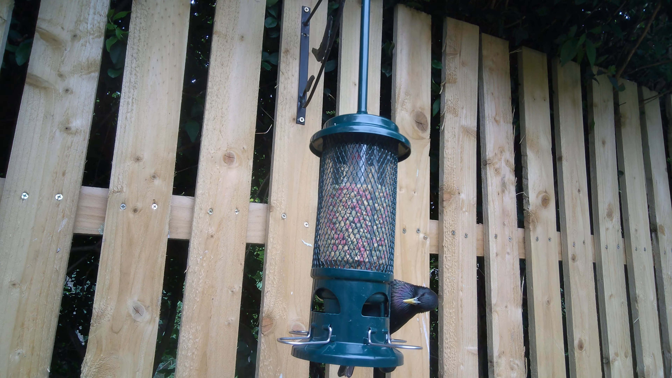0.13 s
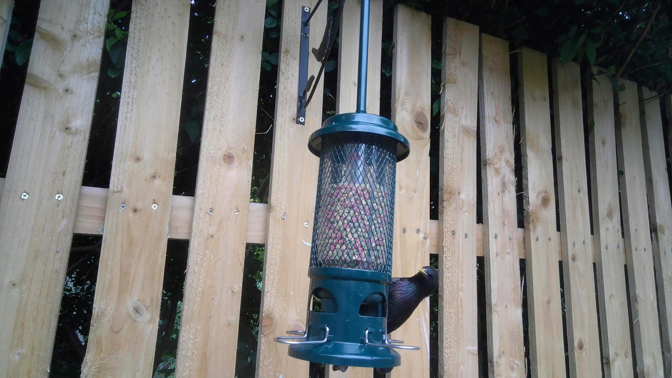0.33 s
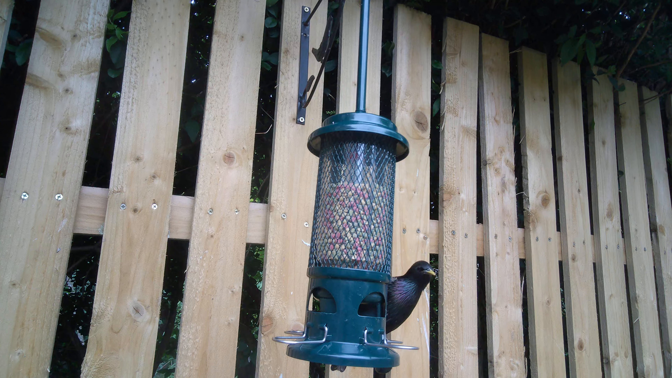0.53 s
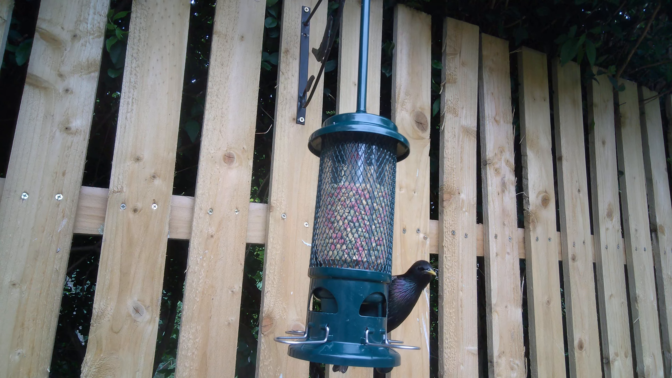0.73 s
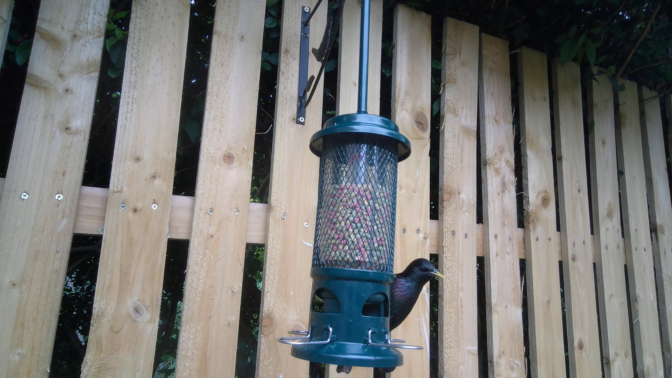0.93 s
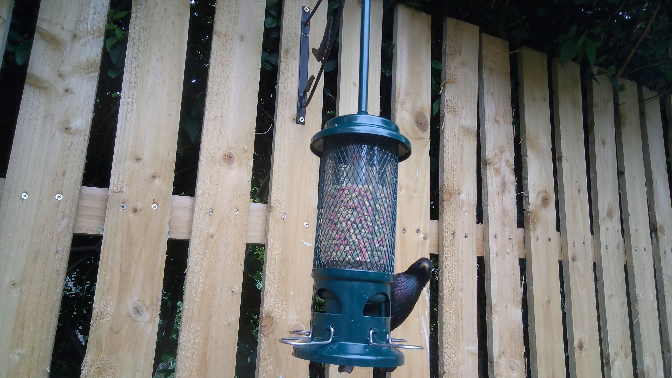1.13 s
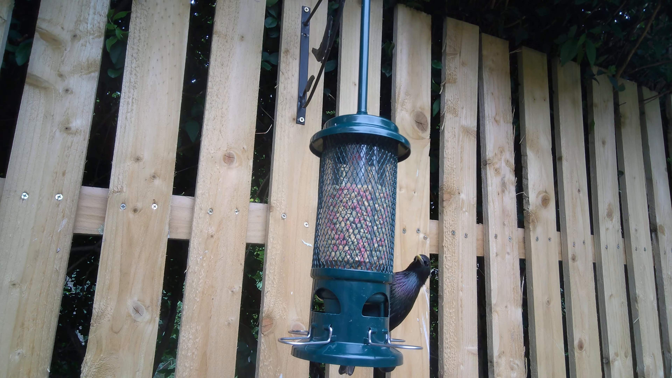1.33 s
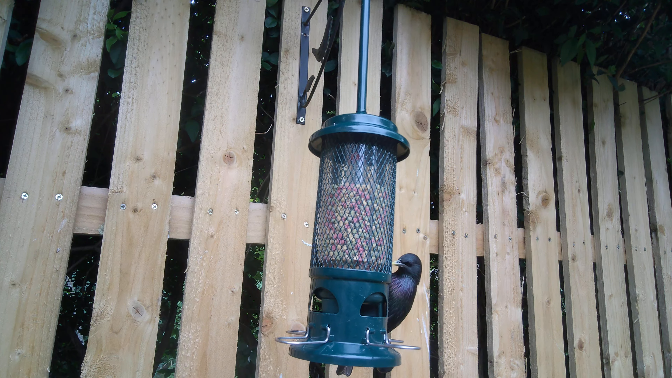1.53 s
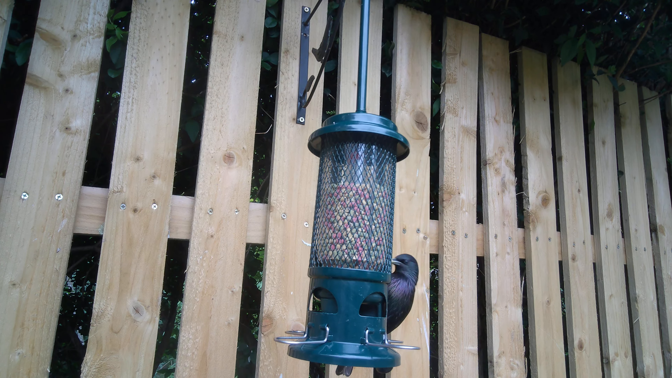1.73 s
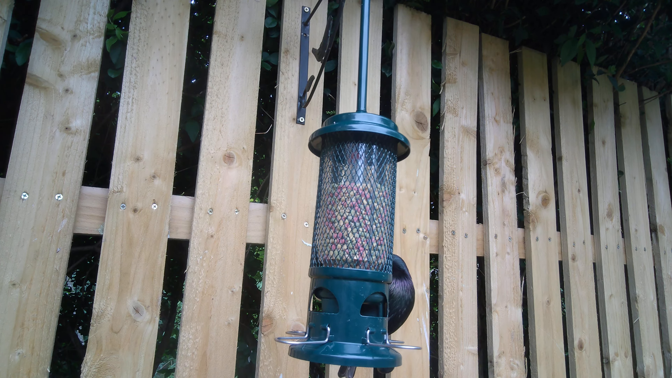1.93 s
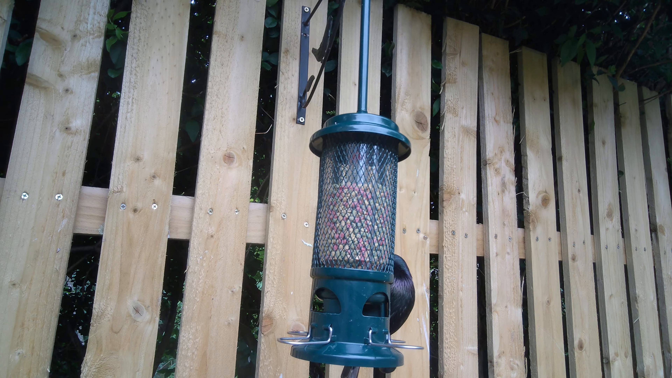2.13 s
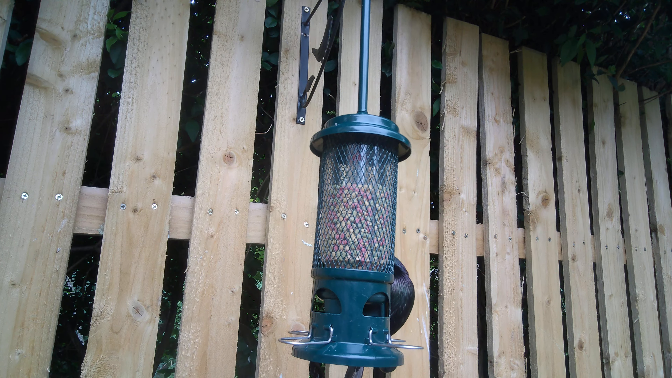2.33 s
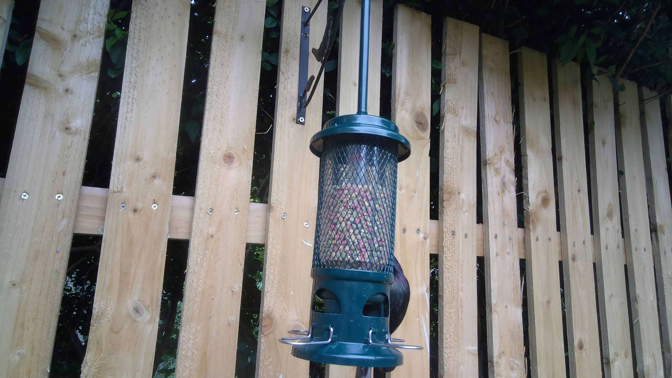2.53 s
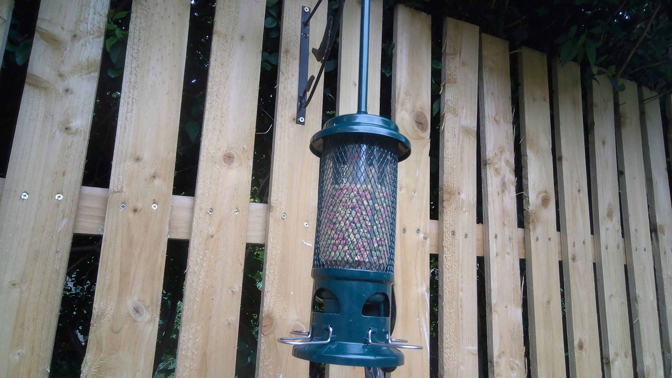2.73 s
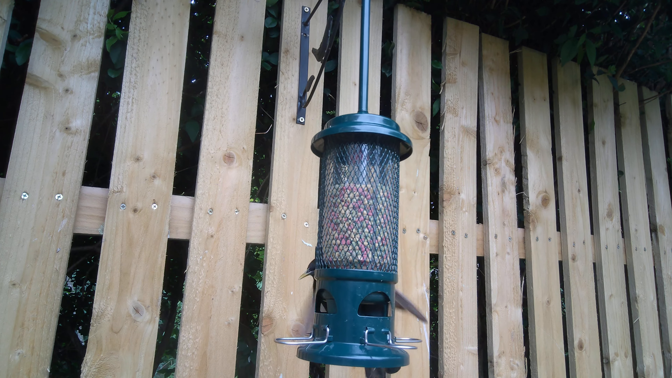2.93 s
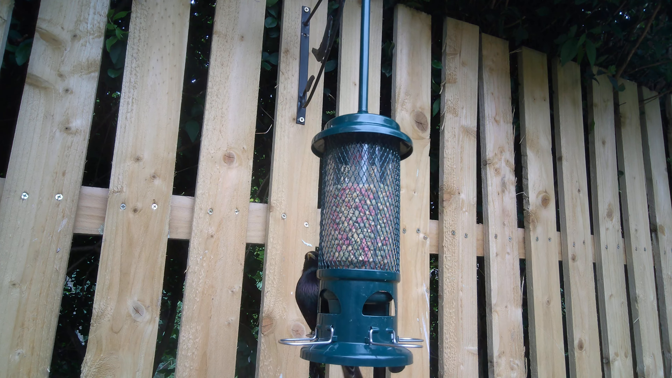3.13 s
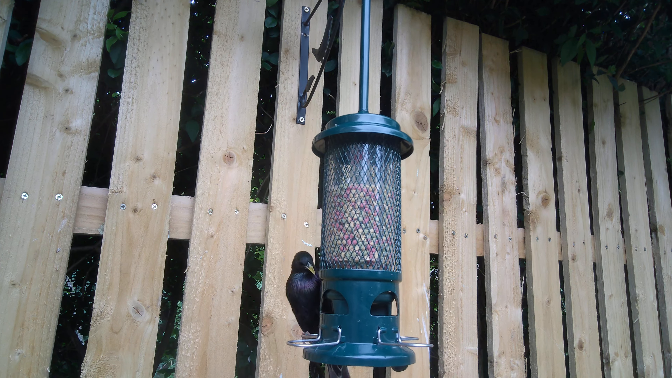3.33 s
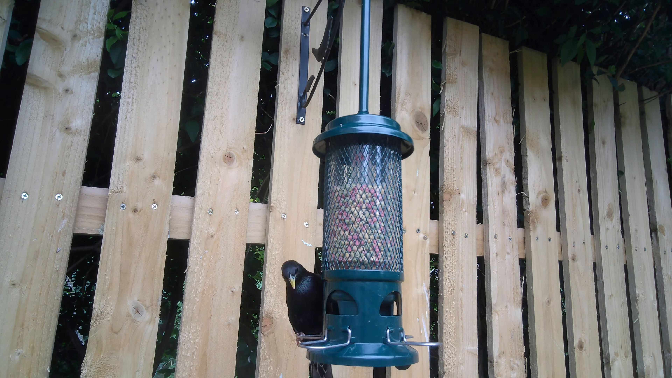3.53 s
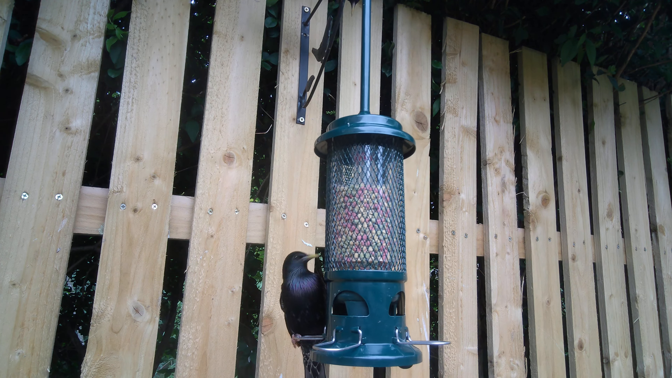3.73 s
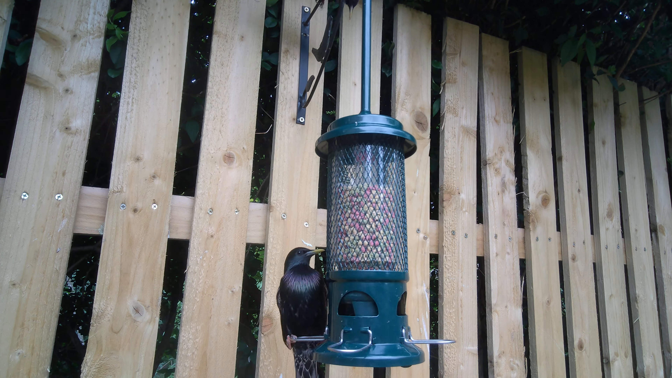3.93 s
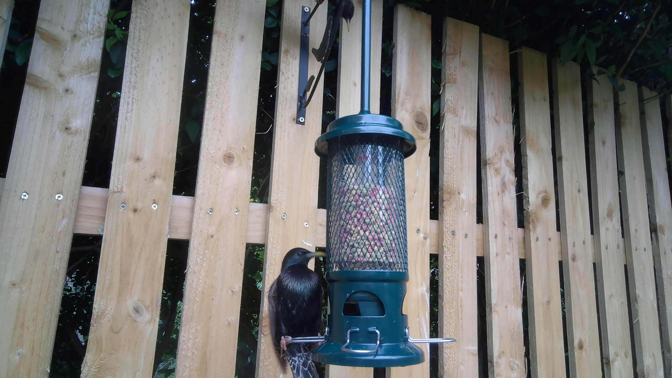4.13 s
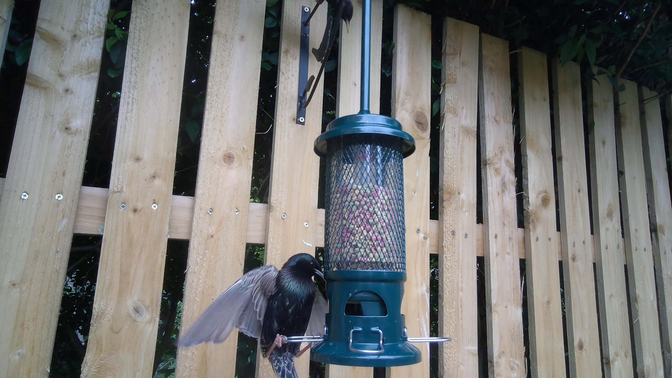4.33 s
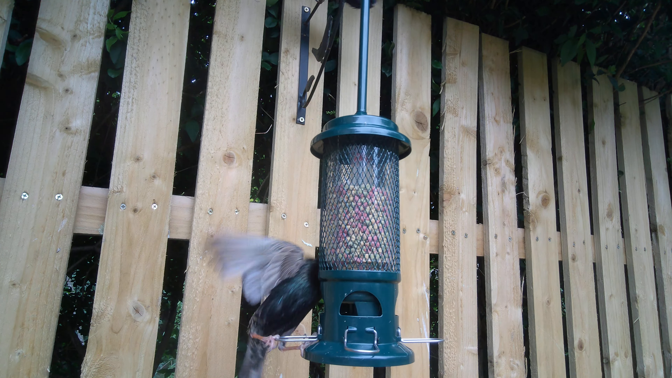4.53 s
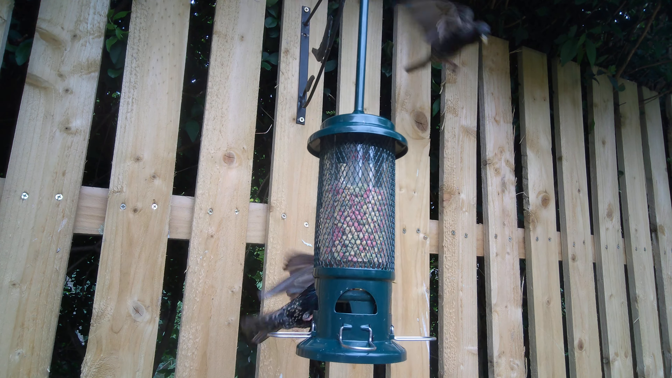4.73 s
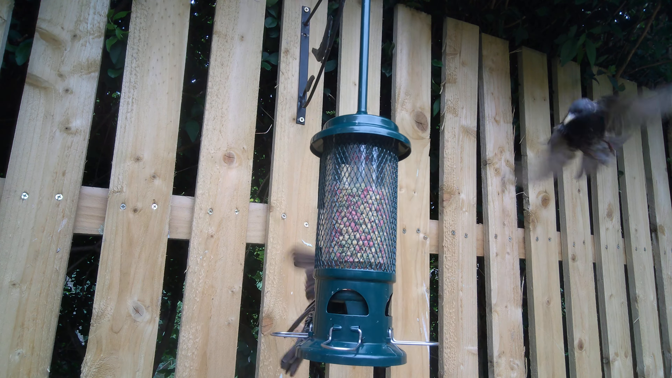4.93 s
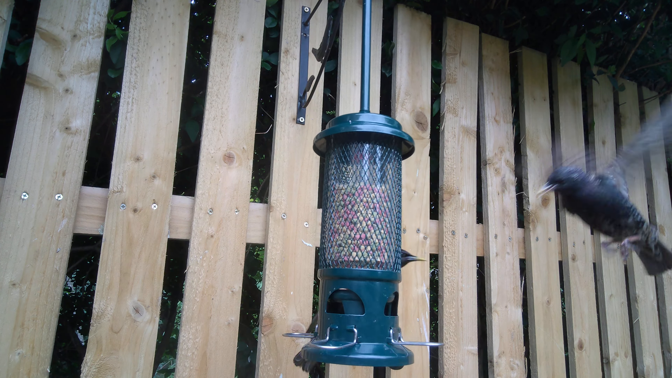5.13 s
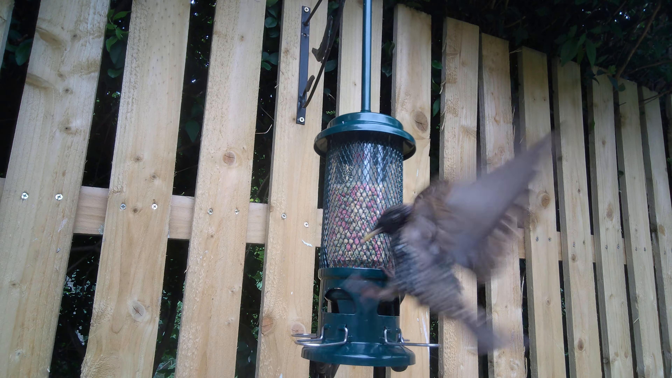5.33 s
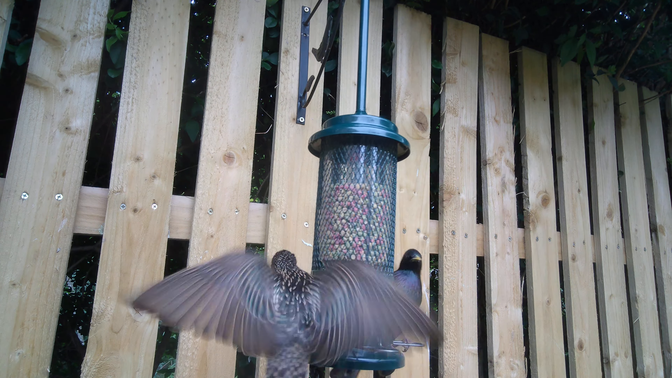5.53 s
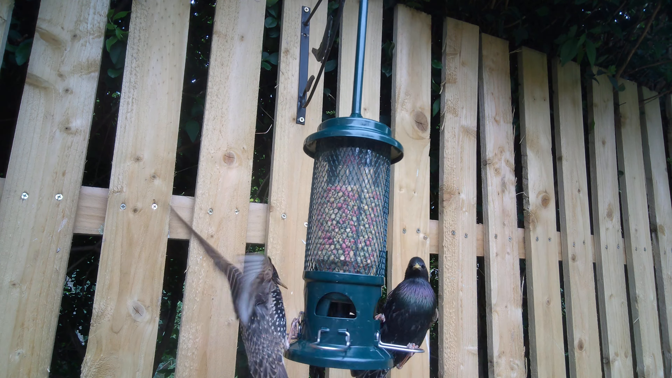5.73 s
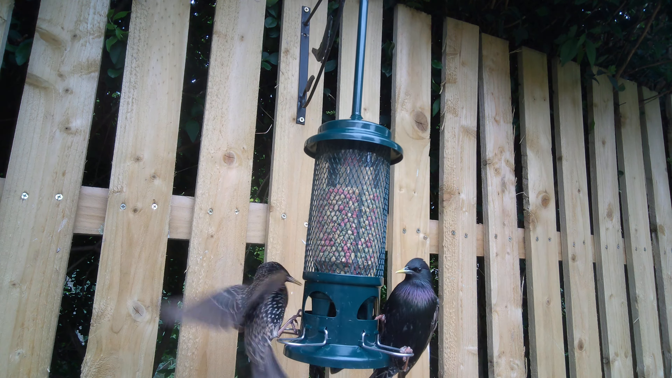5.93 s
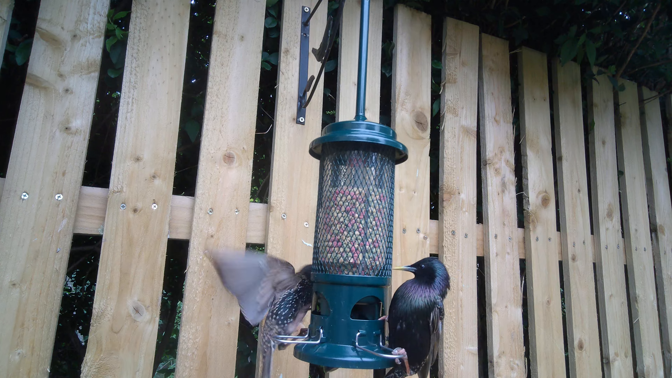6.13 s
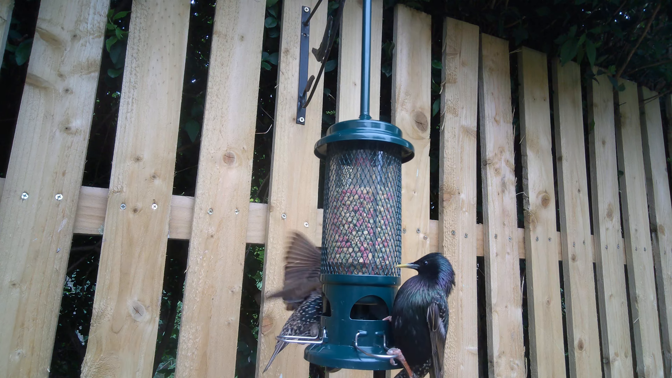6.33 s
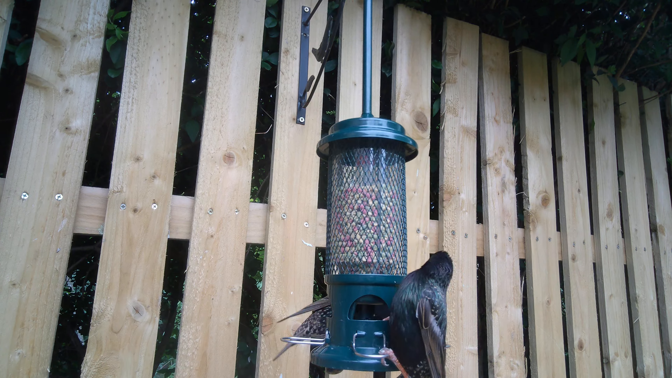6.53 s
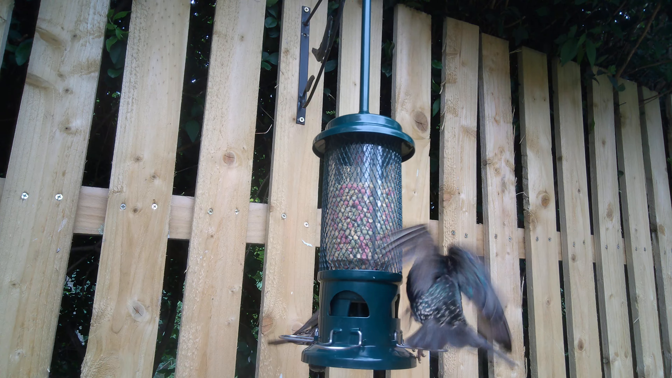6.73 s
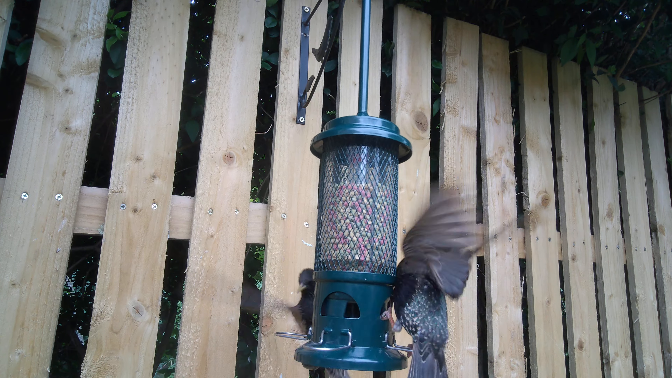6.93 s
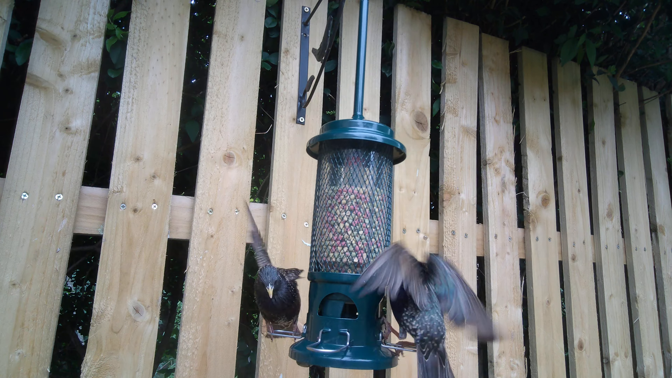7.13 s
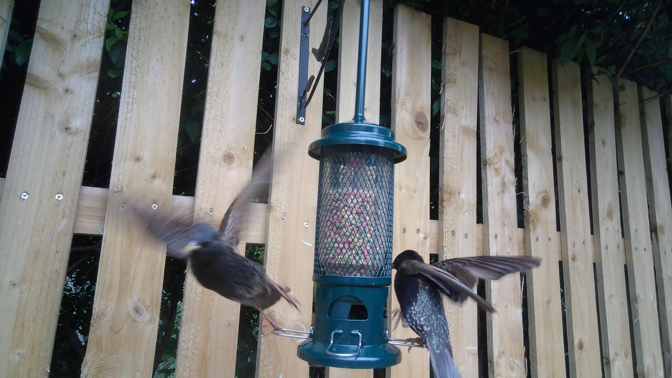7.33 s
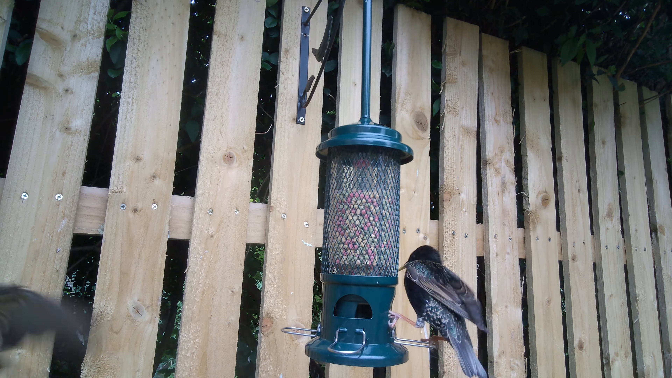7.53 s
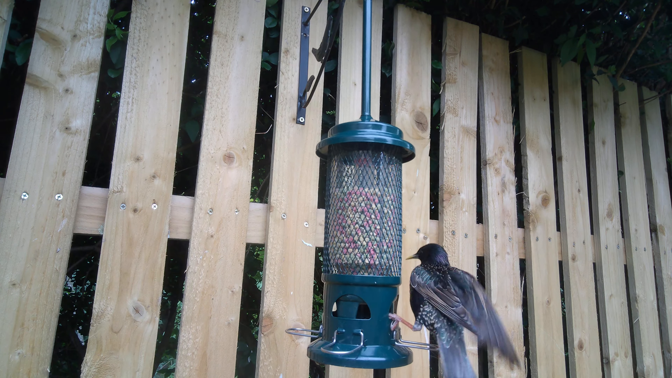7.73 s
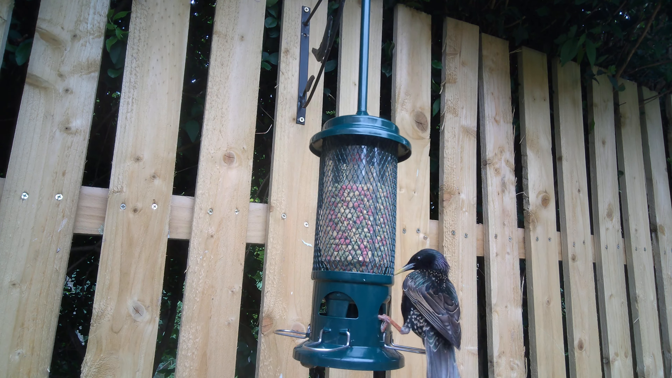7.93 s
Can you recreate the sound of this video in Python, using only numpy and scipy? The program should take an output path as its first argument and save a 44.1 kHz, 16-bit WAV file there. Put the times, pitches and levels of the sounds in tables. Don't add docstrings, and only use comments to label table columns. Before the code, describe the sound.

Starlings scuffle on a metal feeder in a garden, heard from about a metre. Light claw ticks and far rasping calls come first, with thin sliding whistles behind. Claws shuffle on the perches, then a rising harsh squawk, flapping and a sharp slap burst out. Feathers brush the mesh, the tube knocks and rattles, a piercing screech peaks, and wingbeats buffet the microphone before thinning to a swelling background rumble.

```python
import sys
import numpy as np
from scipy import signal
from scipy.fft import rfft, irfft, next_fast_len
from scipy.io import wavfile
from scipy.ndimage import uniform_filter1d

SR = 44100
rng = np.random.default_rng(int(sys.argv[2]) if len(sys.argv) > 2 else 0)


def to_wav(s):
    ch = np.atleast_2d(s).T
    pcm = np.round(np.clip(ch, -1, 1) * 32767)
    wavfile.write(sys.argv[1], SR, pcm.astype(np.int16))


def voltage_ratio(decibels):
    exponent = np.asarray(decibels, float) / 20
    return 10 ** exponent


N = 356460
FIRST_CLAW_S = .4986


def band(x, lo_hz, hi_hz, order=2):
    edges = [lo_hz, min(hi_hz, .45 * SR)]
    return signal.sosfilt(signal.butter(order, edges, "bandpass", fs=SR, output="sos"), x)


def unit(x):
    return x / np.sqrt(np.mean(x ** 2))


def walk(size, rate):
    k = max(int(SR / rate), 1)
    steps = np.repeat(rng.standard_normal(size // k + 1), k)
    return 1.3 * uniform_filter1d(uniform_filter1d(steps, k), k)[:size]


def add(out, s, x):
    i = int(s * SR)
    out[i:i + len(x)] += x[:len(out) - i]


def columns(table, t):
    s, *rest = np.transpose(table)
    return [np.interp(t, s, c) for c in rest]


def coloured(points, lo_hz, hi_hz, flicker_db):
    size = next_fast_len(N, True)
    hz = np.fft.rfftfreq(size, 1 / SR) + 1
    f, db = np.transpose(points)
    spectrum = rfft(rng.standard_normal(size)) * voltage_ratio(np.interp(np.log(hz), np.log(f), db))
    scale = np.std(irfft(spectrum * (hz > lo_hz) * (hz < hi_hz), size))
    octave = np.floor(np.log2(hz))
    out = np.zeros(N)
    for k in range(5, 15):
        part = irfft(spectrum * (octave == k), size)[:N]
        out += part * voltage_ratio(flicker_db * walk(N, 9))
    return out / scale


def air():
    # (f/Hz, level/dB per Hz)
    town_colour = [(53, -27.5), (90, -7), (170, -12), (320, -16.5), (540, -21), (899, -18.5), (2300, -31.5),
                   (5600, -61)]
    # (f/Hz, level/dB per Hz)
    hiss_colour = [(880, -11), (1500, -11.5), (2120, -1.5), (4020, 0.5), (5350, -1.5), (6970, -2),
                   (14500, -4.5), (15800, -17.5)]
    # (t/s, level/dB)
    gain_swell = [(0.0, -71.5), (0.18, -73.5), (1.8, -74), (2.79, -72.5), (2.95, -70), (4.48, -69),
                  (4.7, -64), (5.08, -63.5), (5.29, -49), (5.38, -52), (6.41, -63.5), (6.59, -66.5),
                  (6.75, -55), (6.88, -56.5), (7.72, -57.5), (8.08, -53)]
    # (t/s, level/dB)
    wing_wind = [(0.0, -63), (0.06, -64), (1.57, -62), (2.14, -68.5), (2.2, -63), (4.63, -59.5),
                 (5.31, -35), (5.58, -39.5), (5.69, -49), (6.19, -55), (7.09, -41), (7.2, -53.5),
                 (7.51, -42), (7.54, -64.5), (7.79, -40), (7.88, -56), (7.94, -46), (8.08, -69)]
    t = np.arange(N) / SR
    town_db, = columns(gain_swell, t)
    gust_db, = columns(wing_wind, t)
    hiss_db = .6 * town_db + 0.39 * uniform_filter1d(gust_db, size=SR // 5) - 8.5
    town = voltage_ratio(town_db) * coloured(town_colour, 258, 1640, flicker_db=2.1)
    hum = voltage_ratio(0.58 * town_db - 22.5) * unit(band(rng.standard_normal(N), 74.7, 91.3))
    gust = voltage_ratio(gust_db) * unit(band(rng.standard_normal(N), 19.0, 47.6))
    buffet_db = gust_db - 18.5 + 2.7 * walk(N, 14)
    buffet = voltage_ratio(buffet_db) * unit(band(rng.standard_normal(N), 60, 380, order=1))
    hiss = voltage_ratio(hiss_db) * coloured(hiss_colour, 3100, 21000, flicker_db=1.5)
    return town + hum + gust + buffet + hiss


def trees(length_s):
    t = np.arange(int(length_s * SR)) / SR
    t60_s = .28
    return unit(rng.standard_normal(len(t)) * voltage_ratio(-60 * t / t60_s)) / np.sqrt(len(t))


def songbirds():
    # (t/s, length/s, from f/Hz, to f/Hz, level/dB)
    slides = [(0.602, .12, 5180, 5120, -83), (.876, .091, 6000, 6100, -85), (1.111, 0.027, 1750, 1720, -82),
              (1.173, .13, 7500, 7250, -88), (1.348, .11, 4950, 4940, -82), (2.553, 0.18, 7200, 7100, -92),
              (3.157, 0.051, 5760, 4270, -80), (3.268, .072, 5630, 4220, -81),
              (3.468, 0.049, 5800, 4260, -79), (3.583, .03, 7050, 5900, -78), (3.609, .04, 5850, 5740, -75),
              (3.746, 0.065, 1610, 1390, -77), (3.208, .045, 4300, 5200, -86), (3.34, .05, 4220, 5000, -82),
              (3.52, .05, 4260, 5200, -85), (4.153, 0.068, 5560, 3680, -78), (6.528, .015, 750, 1150, -56),
              (6.537, 0.04, 1915, 2650, -57), (6.562, 0.03, 6400, 5400, -62)]
    # (t/s, length/s, from f/Hz, to f/Hz, level/dB)
    hooks = [
        (1.47, .115, 6450, 4500, -81),
        (1.645, .11, 6600, 4250, -80),
        (1.8, .123, 6600, 4200, -80),
        (1.97, .115, 6550, 4450, -80),
        (2.15, .075, 4200, 5350, -81),
        (2.345, .07, 4100, 5400, -80),
    ]
    out = np.zeros(N)
    for held, whistles in ((0, slides), (.5, hooks)):
        for s, length, hz, end_hz, db in whistles:
            n = int(length * SR)
            u = np.arange(n) / n
            pitch = np.interp(u, [held, 1], [hz, end_hz]) * (1 + 0.013 * walk(n, 243))
            tone = np.sin(2 * np.pi * np.cumsum(pitch) / SR) * voltage_ratio(db + 4.0 + 2.5 * walk(n, 122))
            soft_start = voltage_ratio(np.interp(u, [held - .15, held], [-4, 0]))
            add(out, s, tone * signal.windows.tukey(n, .4) * soft_start)
    return out + voltage_ratio(-1.0) * signal.fftconvolve(out, trees(.3))[:N]


def syrinx(turns, centre_hz, swing_hz, hoarse, beak_db=0):
    # (f/Hz, width/Hz, level/dB)
    beak = [(6300, 1700, -16.5), (9110, 1300, -17.5), (9920, 16000, -23)]
    n = len(turns)
    zigzag = -2 / np.pi * np.arcsin(.97 * np.cos(2 * np.pi * turns))
    hz = centre_hz + swing_hz * zigzag + 480 * hoarse * walk(n, 450)
    phase = 2 * np.pi * np.cumsum(np.clip(hz, 600, 6000)) / SR
    stutter = voltage_ratio((1.5 + 1.2 * hoarse) * walk(n, 400))
    limp = 1 + 0.37 * hoarse * walk(n, 147.0) * np.cos(phase / 2)
    leak = .95 * hoarse * walk(n, 2600)
    voice = unit(band(np.sin(phase) * (stutter * limp + leak), 1500, 5600))
    throat_air = unit(band(rng.standard_normal(n), 1650, 4100))
    voice = voice + voltage_ratio(1) * hoarse ** 2 * stutter * throat_air
    for hz, width, db in beak:
        jet = stutter * rng.standard_normal(n) * voltage_ratio(3 * walk(n, 150))
        voice = voice + voltage_ratio(beak_db + db) * unit(band(jet, hz - width / 2, hz + width / 2))
    return voice


def loose(t, centre, db, hoarse):
    n = len(t)
    turns = np.cumsum(75 * (1 + .3 * walk(n, 40))) / SR
    grit_db = 5.5 * hoarse * walk(n, 109.2)
    voice = syrinx(turns, centre, 1300 * hoarse ** 2, hoarse, beak_db=-4.5)
    return voltage_ratio(db + grit_db) * voice * signal.windows.tukey(n, .15)


def calls():
    # (t/s, length/s, from f/Hz, to f/Hz, peak level/dB)
    rasps = [
        (.58, 0.17, 2100, 2065, -73),
        (2.35, 0.16, 1824, 1840, -67.5),
        (2.93, 0.22, 2200, 2200, -63),
        (3.51, 0.21, 1897, 2090, -66),
        (4.03, 0.25, 2523, 2294, -69),
        (5.8, 0.22, 1900, 1970, -55),
        (7.24, 0.3, 2303, 2200, -55),
        (.84, 0.13, 3880, 3650, -69),
    ]
    # (t/s, length/s, from f/Hz, to f/Hz, peak level/dB)
    chirrs = [
        (.28, .12, 3720, 3530, -76.5),
        (2.125, 0.12, 3550, 3200, -80),
        (5.55, 0.09, 5530, 3600, -49),
        (5.69, .08, 3600, 2400, -52.5),
        (0.882, .15, 2850, 1950, -63),
        (3.743, 0.09, 4250, 4100, -64.5),
        (3.71, .035, 4400, 4200, -64),
        (3.82, .045, 3500, 2750, -70),
        (3.745, .105, 3120, 2170, -59.5),
        (6.738, 0.061, 5500, 5420, -45),
    ]
    # (hoarseness 0-1, share of length rising, rise/dB, fall/dB)
    rasp_delivery = (0.494, 0.41, 6.1, 7.6)
    chirr_delivery = (0.265, 0.23, 3.4, 11)
    out = np.zeros(N)
    hedge = trees(.2)
    for group, (hoarse, crest, rise_db, fall_db) in ((rasps, rasp_delivery), (chirrs, chirr_delivery)):
        for s, length, hz, end_hz, db in group:
            u = np.linspace(0, 1, int(length * SR))
            shape_db = np.interp(u, [0, crest, 1], [-rise_db, 0, -fall_db])
            voice = loose(u, hz + (end_hz - hz) * u ** 2, db + shape_db, hoarse)
            add(out, s, voice)
            add(out, s, voltage_ratio(-4.5) * signal.fftconvolve(voice, hedge))
    return out


def strokes():
    # (t/s, peak level/dB)
    downstrokes = [
        (5.26, -33.5),
        (5.33, -38.5),
        (5.4, -38),
        (7.0, -44),
        (7.466, -44.5),
        (7.687, -36.5),
        (7.773, -34),
        (7.85, -37),
        (7.927, -41),
    ]
    out = np.zeros(N)
    t = np.arange(int(.08 * SR)) / SR
    puff = -np.sin(2 * np.pi * (t / .05) ** .5) * signal.windows.tukey(len(t), .3) * np.exp(-t / 0.04)
    hump = np.sin(np.pi * (t / t[-1]) ** .6) ** 2
    for s, db in downstrokes:
        whoosh = unit(band(rng.standard_normal(len(t)), 400, 14000, order=1)) * hump
        add(out, s, voltage_ratio(db + 9) * puff + voltage_ratio(db - 24.5) * whoosh)
    return out


def sweeps():
    # (t/s, length/s, level/dB, colour f/Hz)
    slides = [(.458, .03, -64.5, 4700), (.497, .025, -62, 8300), (2.93, .04, -68, 5200),
              (3.18, .02, -71, 9500), (3.275, .03, -70, 8000), (3.352, .02, -65, 6000),
              (3.61, .08, -76, 9500), (4.472, 0.11, -68, 9500), (4.67, 0.034, -65, 9000),
              (4.952, .04, -62, 6600), (5.086, 0.06, -49, 9200), (5.244, 0.082, -47, 6500),
              (5.255, .07, -44, 3300), (5.228, .03, -48, 450), (2.38, .1, -76, 3300),
              (2.95, .06, -72, 3500), (3.05, .09, -73, 3600), (3.59, .09, -74, 3300),
              (4.51, .09, -68, 9000), (4.52, .04, -68, 5000), (5.345, 0.033, -48, 8500),
              (5.375, 0.036, -50, 9000), (5.932, .06, -56, 8500), (6.595, 0.049, -53, 6500),
              (6.74, 0.075, -48, 5500), (6.905, .025, -47, 4600), (6.82, .04, -52, 5200),
              (7.59, 0.028, -63, 10000), (5.666, .014, -43, 5970), (6.057, 0.024, -56, 10500),
              (6.115, .025, -60, 10000), (6.157, 0.039, -54.5, 10800), (6.271, .025, -59, 10030),
              (6.311, 0.084, -54, 7500), (6.624, 0.031, -47, 7100), (6.993, 0.033, -51, 8500),
              (7.057, 0.037, -48, 11500), (7.652, .035, -62, 8500), (7.686, .03, -55.5, 8500),
              (7.716, .03, -59, 11000), (7.868, 0.033, -61, 7500), (7.95, .04, -58.5, 9500),
              (8.021, .05, -63, 7500)]
    out = np.zeros(N)
    for s, length, db, hz in slides:
        u = np.linspace(0, 1, int(.1 * SR)) * .1 / length
        hiss = rng.standard_normal(len(u)) * voltage_ratio(2.5 * walk(len(u), 500))
        hump = np.sin(np.pi * np.minimum(u, 1) ** 0.47) ** 2
        add(out, s, voltage_ratio(db) * unit(band(hiss, 0.74 * hz, 1.25 * hz)) * hump)
    return out


def ring(x):
    # (f/Hz, level/dB, t60/s)
    feeder = [(2200, -2.5, 0.1), (2734, 1, 0.04), (3173, -4.5, 0.076), (3890, -5.5, 0.079),
              (4250, -11.5, 0.11), (5010, -33, 0.1), (7500, -5, 0.037), (9600, -10, .03),
              (11100, -12.5, .04), (12900, -13, .03)]
    out = 0
    for hz, db, t60 in feeder:
        pole = np.exp(2j * np.pi * hz / SR - np.log(1000) / (t60 * SR))
        drive = x * voltage_ratio(3.5 * walk(len(x), 25))
        out = out + voltage_ratio(db) * signal.lfilter([1], [1, -pole], drive).imag
    return out


def rustles():
    # (t/s, peak level/dB, feeder ring re peak/dB, top re peak/dB)
    claws = [(FIRST_CLAW_S, -48, -28, -22), (.7652, -60, -7, -6), (.9986, -61, -12, -10),
             (1.1528, -55, -29, -1), (1.44, -57, -8.5, -13), (1.75, -64, -20, -6), (2.19, -65, -20, -7),
             (1.497, -51, -29, -9), (2.6609, -64, -15, -20), (2.8592, -44.5, -20, -14),
             (3.3688, -57, -12, 1.5), (3.706, -50, -10, -28), (3.716, -50, -13, -20),
             (3.731, -49, -20, -11), (2.8592, -51, -14, -17), (4.937, -44.5, -25, -30),
             (4.9423, -38, -25, -30), (4.9468, -37, -25, -30), (4.6183, -46, -15, -30),
             (4.7752, -53, -5, -15), (6.309, -50, -25, -10.5), (3.8675, -45.5, -25, -9.5),
             (6.271, -58.5, -20, 7.5), (5.3736, -42, -15, -5), (7.292, -45, -12, -30),
             (5.6784, -30, -20, -30), (4.4, -54, -20, -25), (3.9877, -50.5, -18, -8)]
    shuffles = [(0.4665, -55.5, -8, -13), (2.765, -51.5, -7, -7), (2.8116, -51, 0.5, -8),
                (2.8757, -46.5, -6.5, -15), (2.9306, -57, 7, 1), (2.9897, -49, -2.5, -8),
                (3.0574, -56.5, -1, -6), (3.3293, -56, 2, -3.5), (3.729, -50.5, -14, -13),
                (3.876, -48.5, -20, -16), (3.9669, -60, -13, -11), (4.3834, -62, -12, -4),
                (4.478, -60.5, 0, -4.5), (4.6183, -43, -4.5, -21), (4.773, -53, 4, -15),
                (4.847, -57, 4, -5.5), (5.0605, -48.5, 0.5, -16)]
    flicks = [
        (5.085, -33, -14.5, -9),
        (5.464, -31, -4.5, -6),
        (5.485, -13, -4, -27.5),
        (6.2686, -55.5, -21, 8.5),
        (6.688, -26, 0, -1),
        (6.9201, -33.5, 1, -3),
        (6.845, -47, -3, -22),
    ]
    feathers = [(5.3202, -23.5, -17, -4.5), (5.3727, -26.5, -2.5, -7.5), (5.5337, -33, -2, 0.5),
                (5.6258, -32, -14, -12), (5.684, -27.5, -9, -32), (5.7657, -50, 3, -1.5),
                (5.9292, -34.5, 2, -23.5), (6.0074, -49, -1, -4.5), (6.0573, -42.5, 0, -4.5),
                (6.159, -56, 9, 0), (6.437, -49, -18.5, -6), (6.638, -31.5, -1, -5),
                (6.725, -30.5, -19, -7.5), (6.8053, -31, -13, -9.5), (6.964, -31.5, 1.5, -1.5),
                (7.054, -40, 3, -5), (7.189, -25, -4, -19.5), (7.2896, -35, -22, -30),
                (7.363, -40.5, -2, -2), (7.473, -42.5, -1, 0), (7.6977, -48, -18, -7),
                (7.777, -35, -6.5, -11), (7.852, -38.5, -3.5, -9), (7.9347, -44, 0.5, -19)]
    decay_s = dict(claw=.09, shuffle=0.22, flick=0.099, feather=0.15)
    colour_hz = dict(claw=5500, shuffle=6340, flick=6800, feather=6200)
    bright, top, shake, beat = np.zeros((4, N))
    t = np.arange(int(.25 * SR)) / SR
    tick = 1 + 1.7 * np.exp(-t / 0.0019)
    swell = 1 - np.exp(-t / 0.00063)
    for kind, start, events in (("claw", tick, claws), ("shuffle", tick, shuffles),
                                ("flick", swell, flicks), ("feather", swell, feathers)):
        hz = colour_hz[kind]
        for s, db, ring_db, top_db in events:
            shape = start * voltage_ratio(db - 60 * t / decay_s[kind])
            roughness_db = 3.5 * walk(len(t), 700) * np.minimum(t / .006, 1)
            burst = rng.standard_normal(len(t)) * voltage_ratio(roughness_db)
            add(bright, s, shape * unit(band(burst, 0.63 * hz, 1.37 * hz)))
            add(beat, s, shape)
            add(top, s, shape * voltage_ratio(top_db))
            add(shake, s, shape * voltage_ratio(ring_db))
    grain = rng.standard_normal((2, N)) * voltage_ratio(4.4 * walk(N, 600))
    top = top * unit(band(grain[0], 8800, 12760))
    mesh = ring(shake * grain[1]) / np.std(ring(grain[1, :SR]))
    scrape = shake * unit(band(grain[1], 1500, 4070))
    thump = beat * unit(band(rng.standard_normal(N), 70, 1180, order=1))
    return voltage_ratio(-27) * thump + voltage_ratio(-14.5) * bright + voltage_ratio(-7.0) * top + voltage_ratio(-12.5) * mesh + voltage_ratio(-17.0) * scrape


def knocks():
    # (t/s, peak level/dB, t60/s, lowest mode level/dB)
    blows = [(5.418, -29.5, 0.043, -6), (5.434, -28, 0.04, -13), (5.489, -27, 0.04, -21),
             (5.678, -47, 0.045, -9), (5.685, -29, 0.04, -6), (6.527, -29, 0.06, 6),
             (6.592, -20, 0.01, -5.5), (6.721, -26.5, 0.028, -7), (6.9, -25, 0.036, -11),
             (7.194, -41, 0.044, -19), (7.286, -36.5, 0.05, 5.5)]
    # (f/Hz, width/Hz, level/dB)
    tube = [(954, 240, 6.5), (2100, 1030, 7), (2700, 200, -10), (4000, 1300, -26)]
    out, push = np.zeros((2, N))
    t = np.arange(int(.12 * SR)) / SR
    for s, db, t60, low_db in blows:
        rattle = 0.51 * rng.standard_normal(len(t)) * voltage_ratio(-60 * t / t60)
        rattle[0] = 4.0
        modes = [voltage_ratio(g) * band(rattle, hz - width / 2, hz + width / 2) for hz, width, g in tube]
        add(out, s, voltage_ratio(db - 1.5) * (voltage_ratio(low_db) * modes[0] + sum(modes[1:])))
        add(push, s, voltage_ratio(db) * rattle)
    return out + voltage_ratio(-39) * band(ring(push), 2430, 7350)


def pings():
    # (f/Hz, level/dB)
    wire = [(2821, -4.5), (3714, 0), (6519, -8), (7531, -8), (8619, -11), (9760, -2), (10980, -3.5),
            (12260, -9), (13630, -16)]
    # (t/s, level/dB, t60/s, brightness/dB per octave)
    releases = [
        (4.52, -69, 0.3, -1),
        (6.92, -48, 0.12, 6),
        (6.437, -66.5, .15, 0),
        (5.33, -54, .12, 2.5),
    ]
    out = np.zeros(N)
    t = np.arange(SR // 10) / SR
    hz, db = np.transpose(wire)[:, :, None]
    damped = np.minimum(t / .003, 1) * np.clip((.05 - t) / 0.011, 0, 1)
    for s, level_db, t60, tilt_db in releases:
        chance = rng.standard_normal((2, len(wire), 1))
        mode_db = db + tilt_db * np.log2(hz / 6000) + 1.5 * chance[0]
        modes = voltage_ratio(mode_db) * np.sin(2 * np.pi * hz * t + 3 * chance[1])
        add(out, s, voltage_ratio(level_db - 60 * t / t60) * damped * modes.sum(axis=0))
    return out


def screech():
    # (t/s, centre f/Hz, level/dB)
    voices = [
        [(6.6, 2150, -50.5), (6.655, 2153, -51), (6.685, 2150, -39), (6.72, 2300, -50), (6.735, 2700, -37.5),
         (6.78, 2650, -43.5), (6.875, 2480, -39.5), (6.91, 2250, -57)],
        [(6.665, 4146, -44), (6.684, 4200, -35.5), (6.7, 4300, -48), (6.72, 4250, -39), (6.742, 4130, -39),
         (6.762, 3970, -35.5), (6.8, 3590, -40.5), (6.85, 3340, -39.5), (6.912, 3575, -40.5)],
    ]
    # (0-1, 0-1, t/s)
    strain = (.28, .47, 6.735)
    # (t/s, length/s, from f/Hz, to f/Hz, level/dB)
    flips = [
        (6.66, .012, 2200, 3300, -47),
        (6.675, .008, 2300, 4200, -43),
        (6.684, .008, 4200, 2400, -46),
        (6.693, .008, 2500, 4200, -45),
        (6.736, .008, 4200, 6100, -48),
        (6.79, .035, 1756, 1700, -56),
    ]
    out = np.zeros(N)
    crack_s = strain[2]
    for voice in voices:
        t = np.arange(voice[0][0], voice[-1][0], 1 / SR)
        hoarse = np.interp(t, [crack_s - .02, crack_s + 0.015], strain[:2])
        add(out, t[0], loose(t, *columns(voice, t), hoarse))
    for s, length, hz, end_hz, db in flips:
        u = np.linspace(0, 1, int(length * SR))
        add(out, s, loose(u, hz + (end_hz - hz) * u, db, .15))
    return out


def squawks():
    # (t/s, centre f/Hz, level/dB)
    curves = [
        [(5.082, 1414, -45), (5.088, 1587, -44.5), (5.12, 2507, -36), (5.14, 3040, -28), (5.16, 3343, -23.5),
         (5.2, 3450, -20.5), (5.242, 3090, -17.5), (5.246, 3060, -29), (5.264, 3100, -36)],
        [(5.912, 1692, -51), (5.935, 2200, -45.5), (5.97, 2950, -43.5), (6.005, 3034, -38.5),
         (6.038, 3036, -40), (6.056, 3040, -58)],
    ]
    # (t/s at which it settles, hoarseness 0-1, closing time/s)
    trills = [
        (5.136, .38, .07),
        (5.957, .46, .015),
    ]
    # (lag/turns, level/dB)
    twins = [
        (.12, -15),
        (.45, -3),
    ]
    eager_per_s, settled_per_s = 67, 51.3
    swing_share, rest_hz, widest_hz = 0.648, 1190, 1020
    out = np.zeros(N)
    for curve, (settle, hoarse, closing), (behind, twin_db) in zip(curves, trills, twins):
        t = np.arange(curve[0][0], curve[-1][0], 1 / SR)
        centre, db = columns(curve, t)
        turns = (t - settle) * np.where(t < settle, eager_per_s, settled_per_s)
        turns = turns + .04 * np.sin(np.pi * turns) ** 2
        still_open = np.clip((t[-1] - t) / closing + 0.33, 0, 1)
        swing = np.clip(swing_share * (centre - rest_hz), 0, widest_hz) * still_open
        rough = hoarse * still_open
        add(out, t[0], voltage_ratio(db) * syrinx(turns, centre, swing, rough))
        add(out, t[0], voltage_ratio(db + twin_db) * syrinx(turns - behind, centre, 1.11 * swing, rough))
    return out


def scene():
    # (delay/ms, level/dB)
    fence = [
        (2.1, -22.5),
        (4.7, -18.5),
        (8.3, -10.5),
        (13, -18),
    ]
    near = songbirds() + calls() + sweeps() + rustles() + knocks() + pings() + screech() + squawks()
    t = np.arange(int(.5 * SR)) / SR
    yard_t60_s, yard_db = 0.55, -24
    tail = rng.standard_normal(len(t)) * voltage_ratio(-60 * t / yard_t60_s) * (t > .012)
    space = voltage_ratio(yard_db) * tail / np.sqrt(np.sum(tail ** 2))
    space[0] = 1
    for ms, db in fence:
        space[int(ms * SR / 1000)] += voltage_ratio(db)
    return (signal.fftconvolve(near, space)[:N] + air() + strokes())[None]


def top_cut(x):
    return signal.sosfilt(signal.butter(12, 16150, fs=SR, output="sos"), x)


def record(dry):
    return top_cut(dry)


dry = scene()
out = record(dry)
to_wav(out)
```